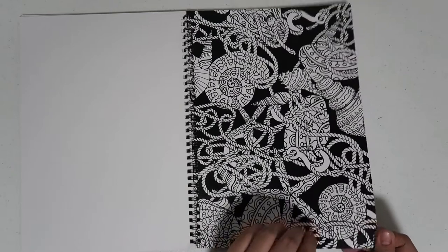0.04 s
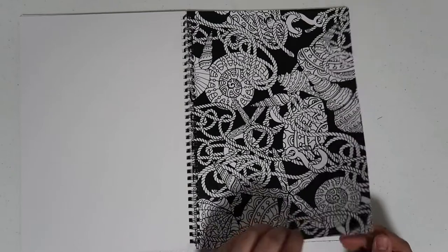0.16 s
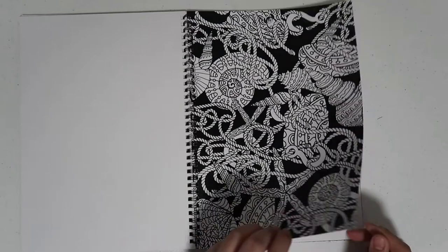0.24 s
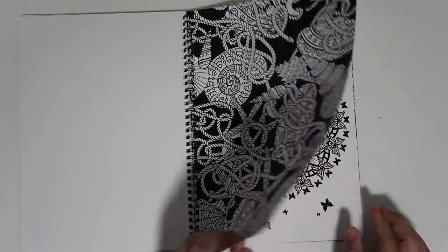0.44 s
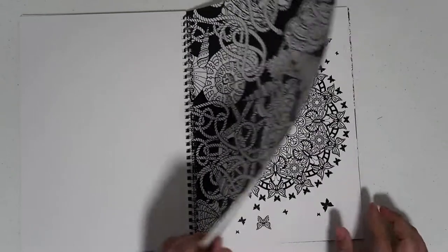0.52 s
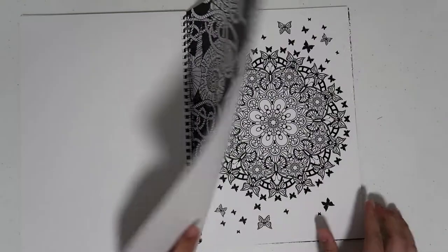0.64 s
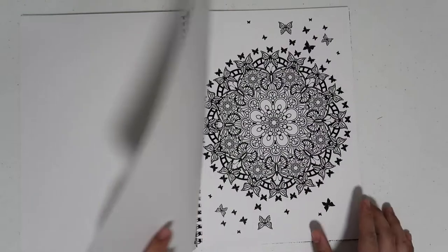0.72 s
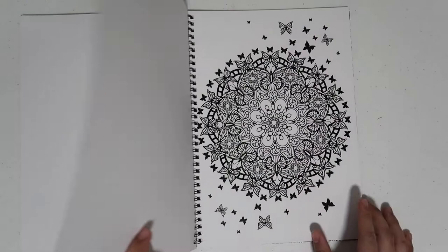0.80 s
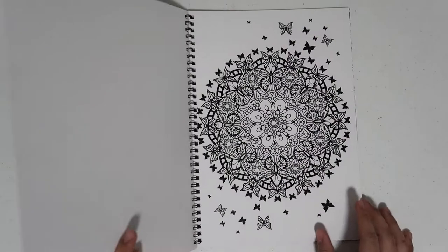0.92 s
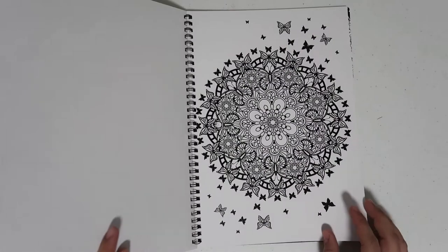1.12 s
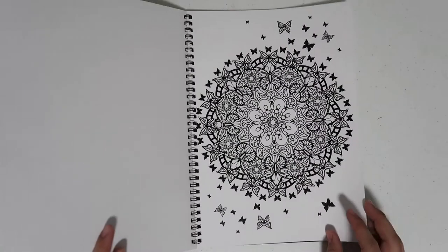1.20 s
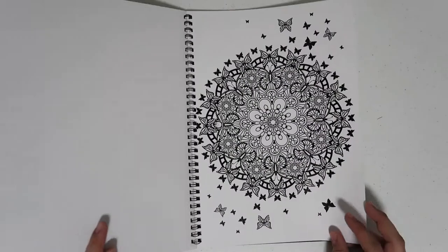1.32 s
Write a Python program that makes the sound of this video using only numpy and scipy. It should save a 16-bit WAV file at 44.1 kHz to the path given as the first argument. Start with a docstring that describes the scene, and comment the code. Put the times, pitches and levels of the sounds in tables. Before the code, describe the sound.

Close recording of one page turn, with hissy finger rubbing, a sharp hollow paper pop, small ticks along the wire binding, a soft swish and faint settling bumps, over low room hum.

```python
"""A low hum and fingers sliding on paper are heard first: a stiff page of a spiral-bound book is being lifted.
The bent sheet buckles with one loud snap of damped modes, just after a corner pings in a rising sine.
Its punched edge ticks and rasps along the wire coil: noise bursts and a gliding narrow band of noise.
Random grains make the swish as it swings over; it settles on a puff of air, with soft bumps on the desk.
Echoes and a decaying noise tail place it all in a small room."""
import sys
import numpy as np
from scipy import signal
from scipy.fft import rfft, irfft
from scipy.io import wavfile

SR = 44100
rng = np.random.default_rng(int(sys.argv[2]) if len(sys.argv) > 2 else 0)


def wav_out(sig):
    """Save sig, one row per channel (or a flat mono array), as 16-bit PCM at SR to the path in sys.argv[1]."""
    wavfile.write(sys.argv[1], SR, np.round(np.clip(np.atleast_2d(sig).T, -1, 1) * 32767).astype(np.int16))


N = 59535  # samples, 1.35 s


def undb(db):
    """Logarithmic level: 20 dB is a factor of ten in amplitude."""
    return 10 ** (np.asarray(db) / 20)


def unit(x):
    """Root-mean-square normalisation: scale to rms 1."""
    return x / np.sqrt(np.mean(x ** 2))


def filtered(x, gain):
    """Linear filtering: multiply the zero-padded spectrum by a function of frequency."""
    hz = np.maximum(np.fft.rfftfreq(2 * N, 1 / SR), 1)
    return irfft(rfft(x, 2 * N) * gain(hz))[..., :N]


def colour(x, points):
    """Spectral shaping: gain interpolated in dB over log frequency from (f/Hz, level/dB) points."""
    hz, db = np.array(points).T
    return filtered(x, lambda f: undb(np.interp(np.log(f), np.log(hz), db)))


def curve(points):
    """Amplitude envelope: gain over time from (t/s, level/dB) points."""
    times, db = np.array(points).T
    return undb(np.interp(since(0), times, db))


def since(start):
    """Elapsed time: seconds since a moment, zero before it."""
    return np.maximum(np.arange(N) / SR - start, 0)


def delayed(x, seconds):
    """Propagation delay: the same sound, later."""
    lag = max(int(seconds * SR), 0)
    padding = [(0, 0)] * (x.ndim - 1) + [(lag, 0)]
    return np.pad(x, padding)[..., :N]


def modes(table, t):
    """Modal synthesis: a sum of damped sines, neighbouring modes starting in opposite directions."""
    total = 0
    for k, (hz, db, t60) in enumerate(table):
        total = total + (-1) ** k * undb(db - 60 * t / t60) * np.sin(2 * np.pi * hz * t)
    return total


def sweep(points, width_hz):
    """Amplitude modulation: low-pass noise on two quadrature carriers makes one gliding noise band."""
    times, _, hz = np.array(points).T
    phase = 2 * np.pi * np.cumsum(np.interp(since(0), times, hz)) / SR
    noise = rng.standard_normal((2, N))
    a, b = unit(filtered(noise, lambda f: 1 / (1 + (f / width_hz) ** 2)))
    return curve([row[:2] for row in points]) * (a * np.cos(phase) + b * np.sin(phase))


# Stereo spread of diffuse sound: f/Hz, side minus mid level/dB
SIDE_SPECTRUM = [(30, -40), (70, -45), (130, -24.5), (250, -5), (1000, -17), (2500, -6.5), (5000, 5),
                 (9000, 3.5)]


def diffuse():
    """Diffuse-field coherence: stereo noise, alike in the bass and largely unrelated in the treble."""
    mid, side = rng.standard_normal((2, N))
    side = colour(side, SIDE_SPECTRUM)
    return np.array([mid + side, mid - side])


# Spectrum of the room noise: f/Hz, relative level/dB per Hz
AIR_SPECTRUM = [(20, -11), (38, -4), (55, 3), (130, 3), (220, -7.5), (320, -9.5), (420, -6), (560, -17),
                (700, -16.5), (1500, -18.5), (3000, -35), (6000, -40), (13000, -46), (16000, -66)]
AIR_DB = -47  # rms


def air():
    """Broadband noise: diffuse random sound shaped to a bass-heavy spectrum."""
    return undb(AIR_DB) * unit(colour(diffuse(), AIR_SPECTRUM))


# Tones of the hum: f/Hz, rms level/dB
HUM_TONES = [(58.6, -44), (119, -54.5), (174, -54.5)]
HUM_WAVER = 0.051  # rms: fraction of amplitude, and phase in radians


def hum():
    """Slow modulation: each steady tone wavers at random in amplitude and phase."""
    out = np.zeros(N)
    for hz, db in HUM_TONES:
        noise = rng.standard_normal((2, N))
        swell, drift = unit(filtered(noise, lambda f: np.exp(-(f / 6) ** 2)))
        phase = 2 * np.pi * (hz * since(0) + rng.random()) + HUM_WAVER * drift
        out += np.sqrt(2) * undb(db) * (1 + HUM_WAVER * swell) * np.sin(phase)
    return out


# Early reflections from the desk and the nearest wall: delay t/s, level/dB before dulling
REFLECTIONS = [(.003, -16.5), (.0074, -15.5)]
# Reverberation by band: centre f/Hz, level/dB, 60 dB decay time t/s
REVERBERATION = [(155, -14, 0.41), (345, -8, 0.4), (730, -4.5, 0.26), (1170, -18.5, 0.57),
                 (1730, -2.5, 0.35), (2100, -10.5, 0.44), (2680, -7, 0.42), (4170, -14.5, 0.1),
                 (11000, -7, 0.081)]
ROOM_DELAY_S = 0.0058


def room(x):
    """Reverberation: two dull early reflections, then a diffuse tail with its own decay in each band."""
    t, noise = since(0), diffuse()
    log_centres = np.log([row[0] for row in REVERBERATION])
    tail = 0
    # Neighbouring bands cross-fade along log frequency.
    for share, (_, db, t60) in zip(np.eye(len(REVERBERATION)), REVERBERATION):
        band = filtered(noise, lambda f: np.interp(np.log(f), log_centres, share))
        fade = undb(-60 * t / t60)
        tail = tail + undb(db) * band * fade / np.linalg.norm(fade)
    dull = colour(x, [(2000, 3), (8000, -17)])
    early = sum(undb(db) * delayed(dull, lag) for lag, db in REFLECTIONS)
    late = signal.fftconvolve(x, delayed(tail, ROOM_DELAY_S), axes=1)[:, :N]
    return x + early + late


# Soft low bumps of the hand and book on the desk: t/s, relative level/dB
DESK_BUMPS = [(0.093, -39), (0.665, -46), (1.177, -45.5), (1.235, -43.5), (1.284, -43.5)]
# Modes of the desk: f/Hz, relative level/dB, 60 dB decay time t/s
DESK_MODES = [(178, 2.5, 0.13), (260, -5.5, 0.17), (412, -1.5, 0.081)]


def bumps():
    """Impact excitation: each bump sets the desk's low modes ringing briefly."""
    return sum(undb(db) * modes(DESK_MODES, since(start)) for start, db in DESK_BUMPS)


# Air squeezed from under the landing sheet: t/s, level/dB, centre f/Hz
AIR_CUSHION = [(.82, -65, 862), (.855, -46.5, 757.6), (0.901, -52.5, 530.6), (.95, -52.5, 453),
               (1.0, -93, 400)]


def cushion():
    """Flow noise: air leaving under the sheet is heard as a noise band gliding down in pitch."""
    return sweep(AIR_CUSHION, width_hz=150)


GRAINS_PER_S, GRAIN_SPREAD_DB = 14000, 3
PAPER_WIDTH = 0.38  # side to mid amplitude


def rustle(levels, spectrum):
    """Granular friction: dense random slips of paper fibres, of very uneven size."""
    happens = rng.random((2, N)) < GRAINS_PER_S / SR
    size = rng.standard_normal((2, N)) * undb(GRAIN_SPREAD_DB * rng.standard_normal((2, N)))
    mid, side = unit(colour(happens * size, spectrum))
    return curve(levels) * np.array([mid + PAPER_WIDTH * side, mid - PAPER_WIDTH * side])


# Fingers and sheet sliding on paper: t/s, mid level/dB
SLIDE_LEVELS = [(0, -61.5), (.07, -52.5), (.15, -47.5), (.21, -47), (.26, -55.5), (.45, -80), (.52, -59),
                (.7, -61), (.82, -57.5), (.9, -52), (.98, -55.5), (1.1, -57.5), (1.22, -57.5), (1.29, -53),
                (1.35, -56.5)]
# Spectrum of the sliding: f/Hz, relative level/dB per Hz
SLIDE_SPECTRUM = [(150, -5), (400, 7), (1200, 0.5), (2200, -4), (3600, -4.5), (6000, -12), (10000, -21),
                  (15000, -27.5)]


def slide():
    """Sliding friction: many small slips under the fingers and sheet merge into a hiss."""
    return rustle(SLIDE_LEVELS, SLIDE_SPECTRUM)


# The sheet flexing as it swings over: t/s, mid level/dB
SWING_LEVELS = [(0, -78), (.45, -52.5), (.53, -55), (.6, -49.5), (.69, -54), (.76, -48), (.83, -50.5),
                (.88, -56), (.98, -63), (1.35, -80)]
# Spectrum of the flexing: f/Hz, relative level/dB per Hz
SWING_SPECTRUM = [(150, -43), (400, -21), (800, 1.5), (1800, -1.5), (2600, -8), (3800, -15), (7000, -28.5),
                  (15000, -42)]


def swing():
    """Bending noise: small slips in the flexing sheet merge into a swish strongest near 1 kHz."""
    return rustle(SWING_LEVELS, SWING_SPECTRUM)


# The punched edge rasping along the coil: t/s, level/dB, centre f/Hz
COIL_RASP = [(.555, -82, 2600), (.565, -42.5, 2600), (.605, -52, 2494), (.65, -56, 2450), (.7, -78, 2450)]


def rasp():
    """Resonant friction: the scraping edge is heard as a narrow noise band that glides down a little."""
    return sweep(COIL_RASP, width_hz=120)


# The wire coil ringing on: f/Hz, gain at resonance/dB, 60 dB decay time t/s
COIL_MODES = [(1530, 1.5, 0.28), (1672, 0, 0.49), (2480, -9, .35), (2572, 5.5, 0.16)]


def coil(x):
    """Resonance: narrow modes of the wire binding, driven by the paper, ring on after it."""
    t, ring = since(0), np.zeros(N)
    for hz, db, t60 in COIL_MODES:
        peak_scale = 2 * np.log(1000) / (t60 * SR)  # makes the gain at resonance 1
        ring += undb(db - 60 * t / t60) * np.sin(2 * np.pi * hz * t) * peak_scale
    return signal.fftconvolve(x, ring)[:N]


# Paper on the coil and the pile: t/s, relative level/dB, centre f/Hz, crackle decay t/s, crisp level/dB
PAPER_TICKS = [(0.0918, -23, 3670, 0.00063, -7), (0.092, -20.5, 1080, 0.0024, -45),
               (0.2307, -23.5, 2800, 0.002, -1), (0.2442, -40, 3800, 0.00084, -27),
               (0.5224, -38, 2880, 0.006, -5.5), (0.5587, -25.5, 2450, 0.0034, -12),
               (0.5608, -23, 800, 0.0012, -37), (0.5650, -27.5, 1480, 0.0082, -36),
               (0.5791, -35, 2270, 0.0029, -27), (0.7386, -30.5, 2340, 0.0017, -8.5),
               (0.7422, -26.5, 1250, 0.0011, -28), (0.7855, -27.5, 2210, 0.0019, -17),
               (0.8066, -30, 1790, 0.0024, -16), (0.8475, -31, 2300, 0.0012, -5.5),
               (0.849, -28, 780, 0.0021, -20), (1.0015, -43, 2370, 0.0031, -4),
               (1.0508, -44, 2020, 0.0019, -23), (1.176, -28, 970, .003, -24),
               (1.2333, -32, 3520, 0.0032, 0), (1.2388, -34, 1210, 0.0015, -13),
               (1.279, -54, 2000, 0.0065, 2), (1.2900, -37.5, 1540, 0.0031, -4)]
# Spectrum of the crisp top: f/Hz, relative level/dB per Hz
CRISP_SPECTRUM = [(500, -2), (2200, -17), (3800, 4), (7000, 2.5), (12000, -10), (16000, -19)]
TICK_CRACKLE = 0.85  # crackle amplitude beside a click of 1
TICK_Q, TICK_DB = 2.66, 0.5


def ticks():
    """Source and filter: a click and brief crackle excite one broad paper resonance, with a crisp top."""
    out, t = np.zeros(N), since(0)
    for start, db, hz, decay, crisp_db in PAPER_TICKS:
        push = TICK_CRACKLE * rng.standard_normal(N) * np.exp(-t / decay)
        push[0] = 1  # the click
        push = delayed(push / np.linalg.norm(push), start)

        def resonance(f):
            """Band-pass response with a gentle extra loss of treble."""
            return 1 / (1 + 1j * TICK_Q * (f / hz - hz / f)) / (1 + .4j * f / hz) ** 2

        body = filtered(push, resonance)
        crisp = undb(crisp_db) * colour(push, CRISP_SPECTRUM)
        out += 4 * undb(db + TICK_DB) * (body / np.linalg.norm(body) + crisp)
    return out


FLICK_S, FLICK_RISE_S, FLICK_T60_S = .2157, 0.00059, 0.0063
FLICK_DB = -8  # start of the decay, before the rise is applied
FLICK_FIRST_HZ, FLICK_LAST_HZ, FLICK_GLIDE_S = 2160, 3190, 0.00074


def flick():
    """Frequency glide: a corner leaves the fingertip and pings, its pitch rising as it straightens."""
    t = since(FLICK_S)
    # The integral of a frequency that approaches its last value exponentially.
    missed = (FLICK_LAST_HZ - FLICK_FIRST_HZ) * FLICK_GLIDE_S * (1 - np.exp(-t / FLICK_GLIDE_S))
    cycles = FLICK_LAST_HZ * t - missed
    decay = undb(FLICK_DB - 60 * t / FLICK_T60_S)
    rise = 1 - np.exp(-t / FLICK_RISE_S)
    return decay * rise * np.sin(2 * np.pi * cycles)


# The sheet buckling, weakly and then strongly: t/s, relative level/dB
BUCKLINGS = [(0.2317, -9.5), (0.2410, 2.5)]
# Modes of the buckling sheet: f/Hz, relative level/dB, 60 dB decay time t/s
SHEET_MODES = [(364, -15, 0.026), (610, -19, 0.022), (1011, -15, 0.035), (1245, 6, 0.013),
               (1640, -9.5, 0.0067), (2094, -17.5, 0.0077), (2413, -13, 0.011), (3610, -21.5, 0.013)]
SNAP_RISE_S, SNAP_DB = 0.0012, -1.5


def snap():
    """Snap-through buckling: the sheet pops over; its modes swell in about a millisecond and die fast."""
    out = np.zeros(N)
    for start, db in BUCKLINGS:
        t = since(start)
        rise = 1 - np.exp(-(t / SNAP_RISE_S) ** 2)
        out += undb(db + SNAP_DB) * modes(SHEET_MODES, t) * rise
    return out


PAN_DB = 0.86  # left over right, for the paper's blows and the coil


def scene():
    """Superposition: the page's sounds add, the room reverberates them, and the background is added."""
    blows = snap() + flick() + ticks()
    pan = undb(np.array([[PAN_DB], [-PAN_DB]]) / 2)
    near = (blows + coil(blows)) * pan
    rubbing = slide() + swing() + rasp()
    background = air() + hum()
    return room(near + bumps() + rubbing + cushion()) + background


CEILING = .99  # amplitude
TOP_HZ = 15000


def record(dry):
    """Saturation and band limiting: the recorder rounds the loudest peaks and cuts the top."""
    rounded = dry / (1 + (dry / CEILING) ** 4) ** .25
    low_pass = signal.ellip(8, .2, 80, TOP_HZ, fs=SR, output="sos")
    return signal.sosfilt(low_pass, rounded)


dry = scene()
out = record(dry)
wav_out(out)
```